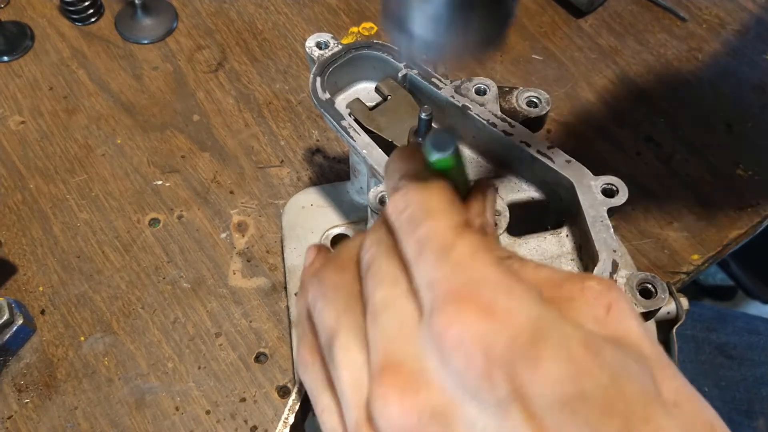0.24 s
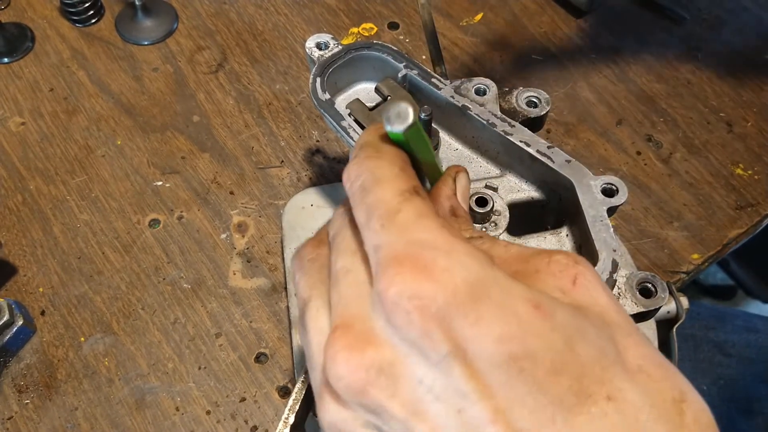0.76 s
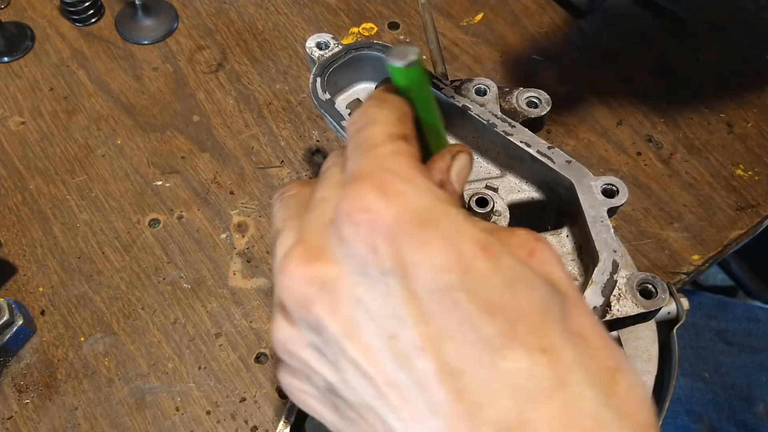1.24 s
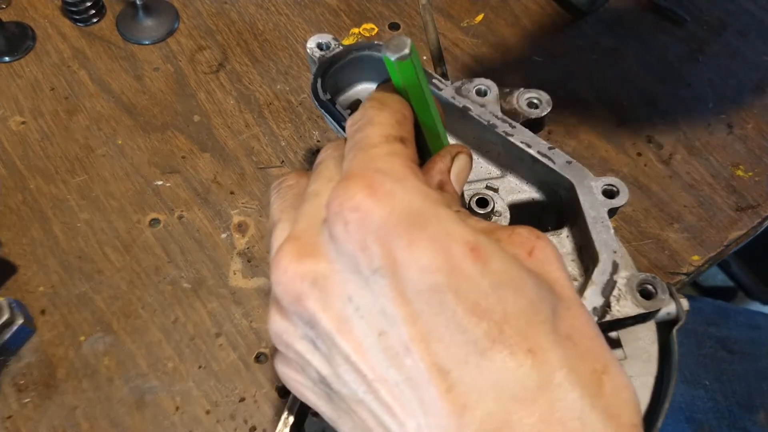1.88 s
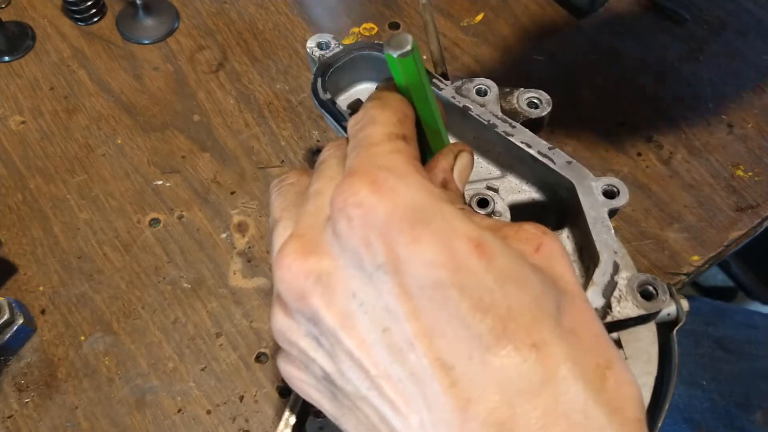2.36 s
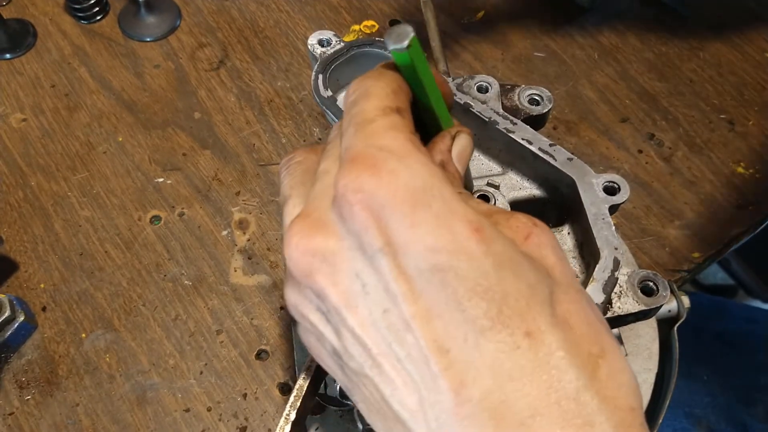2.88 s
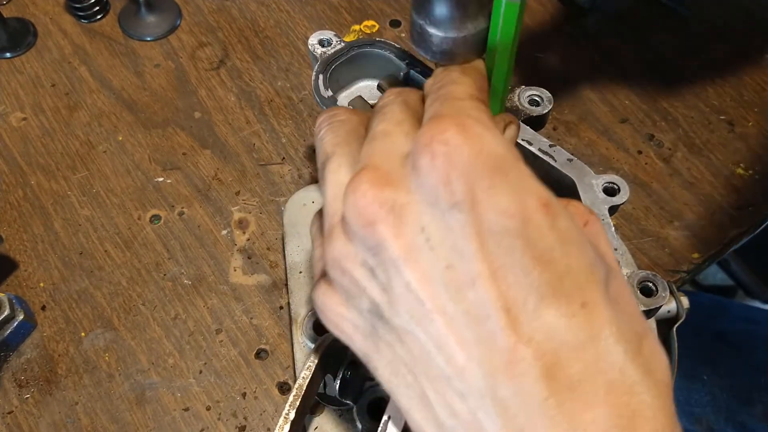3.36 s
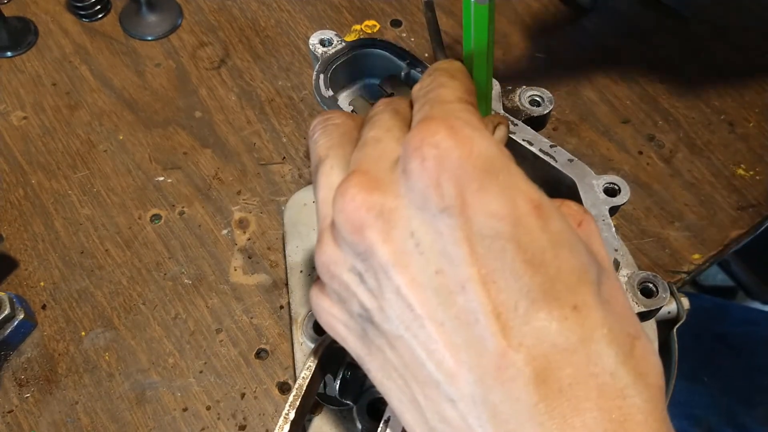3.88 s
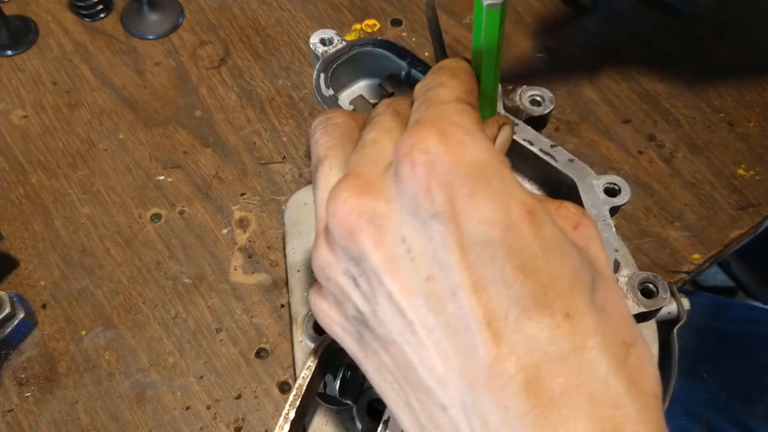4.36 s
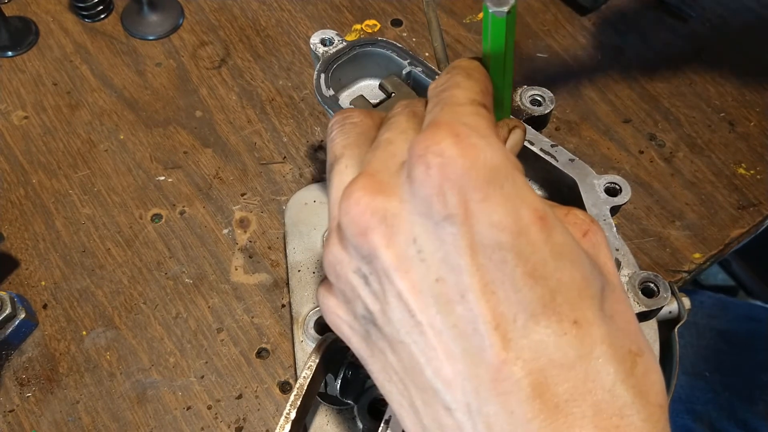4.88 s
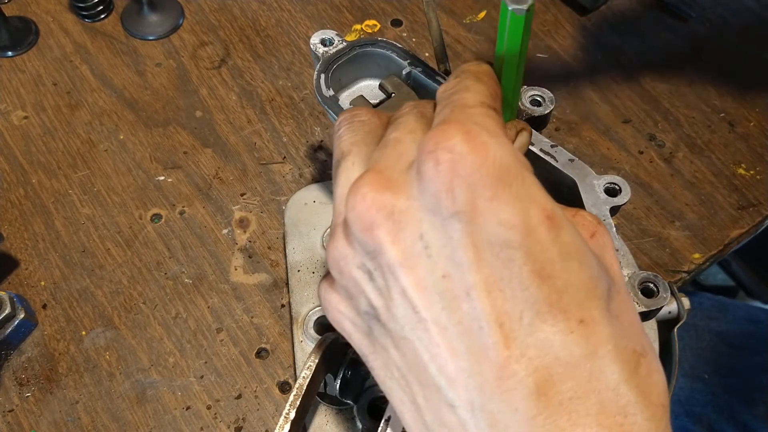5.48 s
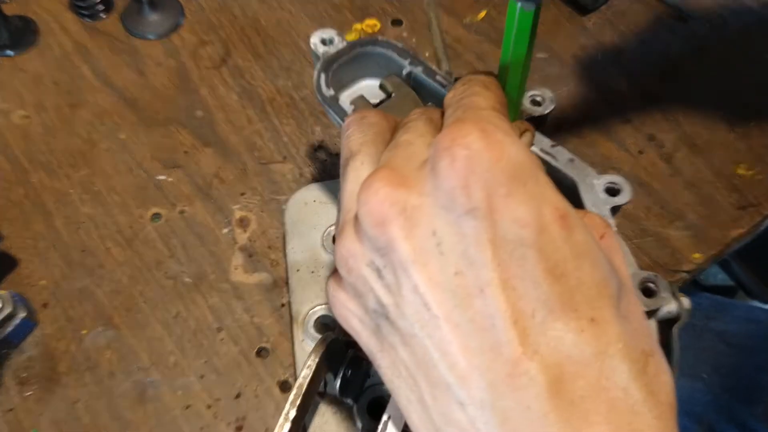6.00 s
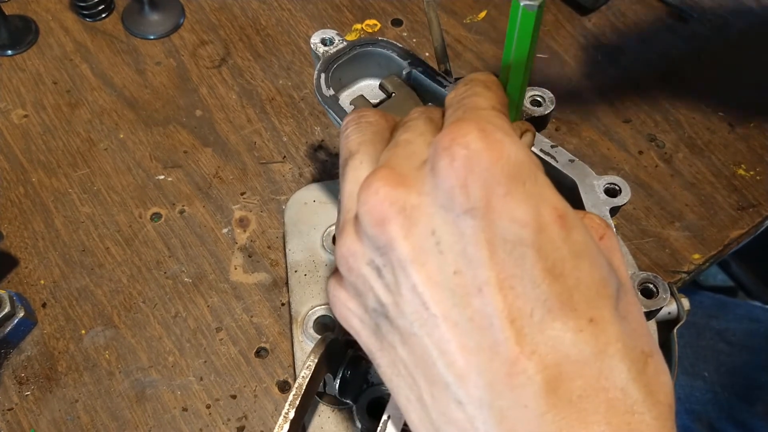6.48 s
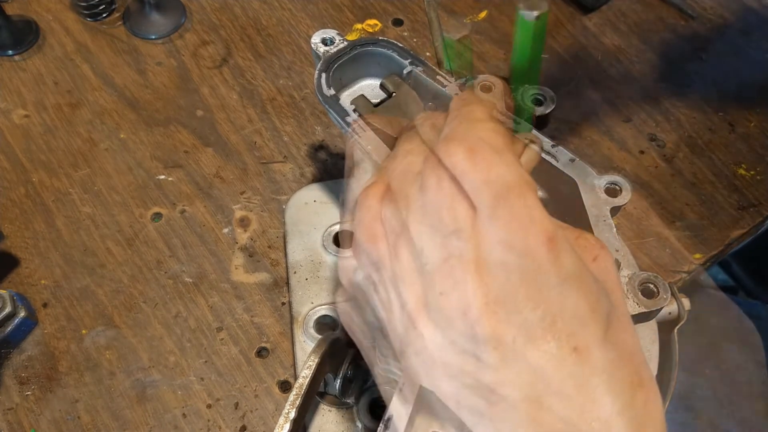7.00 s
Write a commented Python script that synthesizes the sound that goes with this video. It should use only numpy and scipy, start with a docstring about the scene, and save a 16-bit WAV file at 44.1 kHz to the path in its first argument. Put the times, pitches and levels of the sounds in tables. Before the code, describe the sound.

A hammer hits a steel punch set against a metal engine casting on a wooden bench, heard close up in a quiet garage. The sound opens on a fading ring, and a hard blow lands at about 0.2 seconds: a sharp crack, a bright clang and a thud, leaving thin steel pings over a low ringing tone. Faint ticks follow as the punch is moved. A soft tap at 1.6 seconds leads into three increasingly hard blows from 1.9 to 2.5, then a few light clicks. Another tap at 3.4 leads into three more from 3.7 to 4.3, the last very hard, with a clink at 4.5. Three gentle taps between 5.1 and 5.7 seconds build into three stronger blows from 6 to 6.6. After the stronger blows in each run, the casting rocks back with a small hollow clunk. The ringing fades around 7 seconds.

```python
"""Sharp hammer blows on a steel punch, set against an engine casting on a wooden garage bench.
Each blow cracks, thuds through the bench, sets the casting clanging and leaves thin steel pings
over a low ring. The casting rocks back after hard blows, and the punch ticks as it is moved.
A close camera's limiter ducks the hard blows and lets their tails swell back."""
import sys
import numpy as np
from scipy import signal
from scipy.fft import rfft, irfft, next_fast_len
from scipy.io import wavfile
from scipy.ndimage import uniform_filter1d, minimum_filter1d, map_coordinates

SR = 44100
rng = np.random.default_rng(int(sys.argv[2]) if len(sys.argv) > 2 else 0)


def transcribe(u):
    """Save the signal u as a 16-bit wav file named by the first command-line argument.

    u: samples, shape (n,) or (channels, n), limited to [-1, 1]; the rate is SR.
    q: integer samples, one column per channel.
    """
    v = np.clip(np.atleast_2d(u).T, -1, 1)
    q = np.round(v * 32767).astype(np.int16)
    wavfile.write(sys.argv[1], SR, q)


N = 319284
PREROLL = SR // 2  # samples ahead of time zero, so the scene can open on a ringing blow


def amp(db):
    """Decibels to gain."""
    return 10 ** (np.asarray(db) / 20)


def curve(points, hz):
    """Read (Hz, value) points along a log frequency axis."""
    f, v = np.transpose(points)
    return np.interp(np.log(hz + 1), np.log(f + 1), v)


def pan(db):
    """Left and right gains; positive dB leans left."""
    return amp(np.multiply.outer([.5, -.5], db))


def add(mix, s, sound):
    """Lay a sound into the mix at a time in seconds."""
    part = mix[:, PREROLL + round(s * SR):][:, :sound.shape[1]]
    part += sound[:, :part.shape[1]]


def ring(hz, gains, t60, phases, length, attack_s, flutter, rate=100):
    """Damped stereo sines; flutter smears each into a cluster of neighbours."""
    t, place = np.arange(length) / SR, np.arange(length // 100 + 2)
    real, imag = rng.standard_normal((2, len(hz), len(place)))
    rates = np.broadcast_to(rate, hz.shape)
    sway = np.array([np.interp(t * r, place, knots) for r, knots in zip(rates, real + 1j * imag)])
    wave = (1 + flutter * sway) * np.exp((2j * np.pi * hz - np.log(1000) / t60)[:, None] * t)
    return ((gains * np.exp(1j * phases)) @ wave).imag * (1 - np.exp(-t / attack_s))


# Decay of the noise tails. Each row: frequency in Hz, t60 in seconds before stretching.
TAIL_T60 = [(40, 0.97), (150, 0.31), (500, 0.32), (2000, 0.37), (8000, 0.36), (16000, 0.28)]
# Stereo width. Each row: frequency in Hz, left-right likeness (1 is mono).
LIKENESS = [(40, 0.86), (150, 1), (500, 0.21), (2000, 0.012), (8000, 0.014)]
# Stereo lean. Each row: frequency in Hz, pan in dB.
BAND_PAN = [(40, -5), (300, 4.5), (1000, 6), (3000, 6), (9000, -3), (15000, -1)]
def noise(spectrum, length, stretch=np.inf):
    """Coloured stereo noise, each band dying at its own speed; steady if no stretch is given."""
    hz, t, white = signal.stft(rng.standard_normal((2, length)), SR, nperseg=256)
    width = np.arccos(np.clip(curve(LIKENESS, hz), -1, 1))[:, None] / 2
    mid, side = white[0] * np.cos(width), white[1] * np.sin(width)
    colour = amp(curve(spectrum, hz))
    colour = colour / np.sqrt(np.mean(colour ** 2)) * pan(curve(BAND_PAN, hz))
    fade = amp(-60 * t / (stretch * curve(TAIL_T60, hz)[:, None]))
    bands = np.array([mid + side, mid - side]) * colour[..., None] * fade
    return signal.istft(bands, SR, nperseg=256)[1][:, :length]


# Colour of the garage air. Each row: frequency in Hz, relative density in dB.
AIR_EQ = [(15, -45), (25, -24), (118, -9), (321, -24), (422, 12), (553, -28.5), (1060, -24), (9330, -33.5),
          (15200, -44.5), (16500, -59)]
def room_tone():
    """A faint, steady bed of air."""
    return amp(-75) * noise(AIR_EQ, PREROLL + N)


# Colour of metal hitting metal. Each row: frequency in Hz, relative density in dB.
CLATTER_EQ = [(180, -27), (300, -10.5), (367, -8.5), (617, -7.5), (954, -3), (2360, -13), (2890, -7.5),
              (3710, -16), (4240, -11.5), (6140, -9.5), (6670, -8.5), (9300, -8), (11800, -11.5),
              (15200, -17), (16500, -44)]
def clatter(length, stretch=np.inf, tilt_db=0):
    """Bright metallic noise, tilted in dB per octave."""
    return noise([(hz, db + tilt_db * np.log2(hz / 2000)) for hz, db in CLATTER_EQ], length, stretch)


# The casting's landings. Each row: start in seconds, pitch in Hz.
LANDINGS = [(1.936, 409), (2.219, 434), (2.526, 357), (3.784, 423), (4.07, 395), (4.362, 377), (6.078, 396),
            (6.375, 383), (6.670, 416)]
def clunks():
    """The casting rocks back onto the bench: a hollow bump with a little clatter."""
    mix, n = np.zeros((2, PREROLL + N)), SR // 8
    ratios, t60 = np.array([.8, 1, 1.3, 2.1]), np.full(4, .07)
    gains = amp([[-12.5, 12, -1.5, -2], [-9, -14, -11.5, -9.5]])  # left, right
    for s, hz in LANDINGS:
        bump = ring(hz * ratios, gains, t60, np.zeros(4), n, attack_s=0.0037, flutter=1)
        add(mix, s, amp(-19) * (bump + amp(-4.5) * clatter(n, stretch=0.31)))
    return mix


# The casting's modes. Each entry: pitch in Hz.
CLANG_HZ = [117, 190, 345, 838, 929, 1815, 1845, 2514, 2890, 3222, 3467, 3920, 4175, 4403, 4477, 4883, 5250,
            5303, 5730, 6170, 6493, 6602, 7020, 7320, 8050, 8440, 9210, 9570, 11200, 13300]
# The same modes. Each row: relative level in dB, t60 in seconds before stretching.
CLANG_MODES = [(-13.5, 0.33), (-12.5, 0.13), (-8.5, 0.16), (-2, 0.2), (-1.5, 0.18), (-10.5, 0.3),
               (-15.5, 0.35), (-19.5, 0.2), (-2, 0.33), (-12, 0.32), (-15.5, .3), (-8, 0.11), (-9.5, 0.36),
               (0, 0.07), (-6.5, 0.28), (-3, 0.21), (-5, 0.2), (-8, 0.18), (-14, 0.33), (-8, 0.37),
               (-1.5, 0.14), (-8.5, 0.095), (-9.5, 0.12), (-26.5, 0.67), (-5.5, 0.22), (-2, .2),
               (-9.5, 0.32), (-9.5, 0.31), (-21.5, 0.4), (-17, 0.14)]
def clang(length, stretch, path, tilt_db):
    """Each hit stirs the casting's modes anew; path sets each mode's pan and left-right phase."""
    hz, (db, t60) = np.array(CLANG_HZ), np.transpose(CLANG_MODES)
    scatter, phase = rng.standard_normal((2, len(hz)))
    gains = amp(db + 3 * scatter + tilt_db * np.log2(hz / 2000)) * pan(curve(BAND_PAN, hz) + 5 * path[0])
    phases = np.pi * phase + np.outer([1, -1], 1.397 * path[1] * np.minimum(hz / 600, 1))
    return ring(hz, gains, stretch * t60, phases, length, 0.00047, flutter=2.5, rate=20 + .016 * hz)


# Modes of the punch's tip. Each row: pitch in Hz, relative level in dB, t60 in seconds.
TIP_MODES = [(5330, 1, 0.041), (8500, -13, 0.029), (13150, -25.5, 0.083), (3720, -14.5, 0.061)]
# Colour of a tick's low knock. Each row: frequency in Hz, relative density in dB.
KNOCK_EQ = [(59, -55.5), (100, -12.5), (417, -9.5), (641, -11), (1880, -17), (2310, -18), (2500, -15.5),
            (3250, -36.5), (5500, -120)]
# Light contacts. Each row: start in seconds, level in dB, knock and clink trims in dB, pan in dB.
CONTACTS = [(0.6633, -39, 0, -4, -1), (0.7383, -53.5, 1, -10.5, -7), (0.9029, -54.5, 5.5, -26, -3),
            (0.923, -59, 9.5, -22, -6), (1.064, -53, -11.5, -31, -8.5), (1.3987, -67.5, -53, -5.5, -17),
            (1.5581, -68, 16, 5.5, -6.5), (2.6232, -17.5, -28.5, -21, -7.5), (2.8744, -54.5, -13, -17, -1),
            (2.9657, -36, -12, -9, 0.5), (3.0395, -34, -20.5, -15, -5.5), (3.326, -63, -30.5, -12.5, -7.5),
            (4.5177, -20, -21.5, 5, -2.5), (4.6698, -32, -8, -38, 7), (7.0586, -60, -1, -24, -6),
            (7.0891, -55.5, -11, -18.5, -3)]
def ticks(path):
    """The punch and loose parts touch the casting: a click, a little clang, a clink and a knock."""
    mix, n = np.zeros((2, PREROLL + N)), SR // 5
    t = np.arange(n) / SR
    hz, tip_db, t60 = np.transpose(TIP_MODES)
    for s, db, knock_db, clink_db, pan_db in CONTACTS:
        click = (amp(-20) + amp(-6 - 60 * t / 0.0061)) * clatter(n, stretch=0.47)
        body = amp(-25) * clang(n, 0.8, path, tilt_db=-2.5)
        phases = np.pi * rng.standard_normal((2, len(hz)))
        clink = ring(hz, amp([tip_db, tip_db]), t60, phases, n, attack_s=0.00037, flutter=1.4, rate=250)
        knock = amp(knock_db) * noise(KNOCK_EQ, n, stretch=0.53)
        add(mix, s, amp(db) * pan(pan_db)[:, None] * (click + body + amp(clink_db) * clink + knock))
    return mix


# Where the low ring falls away until the next blow. Each entry: start in seconds.
LOW_RING_FADES = [1.03, 4.915, 6.87]
def low_ring(hz=425.5, swell_s=0.31, sag_db_per_s=9.5, fade_db=17, fade_s=0.66):
    """One slightly unsteady tone, far to the left; every hammer blow sets it ringing anew."""
    starts, db = np.transpose(HAMMER_BLOWS)[[0, -1]]
    t = (np.arange(PREROLL + N) - PREROLL) / SR
    last = np.maximum(np.searchsorted(starts, t) - 1, 0)
    fade = sum((starts[last] < at) * np.clip((t - at) / fade_s, 0, 1) for at in LOW_RING_FADES)
    target_db = db[last] - sag_db_per_s * (t - starts[last]) - fade_db * fade
    pole = np.exp(-1 / (swell_s * SR))
    lagging_db = signal.lfilter([1 - pole], [1, -pole], target_db - db[0]) + db[0]
    level_db = np.minimum(target_db, lagging_db + sag_db_per_s * swell_s)  # slow up, fast down
    drift = map_coordinates(rng.standard_normal(80), [np.linspace(0, 79, len(t))])
    phase = 2 * np.pi * hz * t + .3 * drift - np.array([[1.6], [0]])
    return amp(uniform_filter1d(level_db, SR // 50)) * pan(16.6)[:, None] * np.sin(phase)


# The long steel rings. Each entry: pitch in Hz.
PING_HZ = [971, 1060, 1239, 1388, 1875, 2817, 2900, 2937, 4239, 6424, 6526]
# The same rings. Each row: relative level in dB, t60 in seconds, pan in dB,
# left phase lead in radians, family (0 first, 1 second).
PING_MODES = [(-17.5, 0.52, -10, 0.5, 1), (-38, 0.92, -8, -1.5, 0), (-36, 1, 2, 2.1, 0),
              (-25.5, 0.61, 1, 1.5, 1), (-18, 0.47, -0.5, 2.03, 1), (-8, 0.55, -12.5, 3.5, 0),
              (-10, 0.25, -5, 2, 1), (-7, 0.46, -11.5, -2, 0), (-15.5, 0.3, 5, 2.4, 1),
              (-15.5, 0.42, -15, 4, 0), (-1, 0.39, -7.5, -2, 1)]
def steel_pings(first_db, second_db):
    """Struck steel rings on in two families of thin tones, each at its own level."""
    hz, (db, t60, pan_db, lead, family) = np.array(PING_HZ), np.transpose(PING_MODES)
    scatter, phase = rng.standard_normal((2, len(hz)))
    gains = amp(db + np.where(family > .5, second_db, first_db) + 3 * scatter) * pan(pan_db)
    phases = np.pi * phase + np.outer([.5, -.5], lead)
    return ring(hz, gains, t60, phases, 4 * SR // 5, attack_s=0.0084, flutter=0.24, rate=23)


# Colour of the wooden bench. Each row: frequency in Hz, relative density in dB.
BENCH_EQ = [(15, -46), (30, -16), (55, 0), (86, -6), (114, 4), (275, -8), (330, -0.5), (700, -13),
            (910, -41.5), (1540, -120)]
def bench_thud(t, stretch):
    """The bench takes the blow with a soft-edged, bassy thump."""
    return (1 - np.exp(-t / 0.012)) * noise(BENCH_EQ, len(t), stretch)


# Tail lengths. Each entry: one blow's factor on the decay of its clatter, clang and thud.
BLOW_STRETCH = [0.86, 0.92, 0.88, 0.87, 0.95, 0.97, 0.89, 0.95, 0.93, 0.88, 0.7, 0.83, 0.87, 0.93, 0.96,
                0.93]
# The blows. Each row: start in seconds, strength in dB, trims in dB for the thud, first pings and
# second pings, pan in dB, level of the low ring in dB.
HAMMER_BLOWS = [(-.1, 4.5, -10, -23.5, -16, -4, -49), (0.1881, 5.5, -10.5, -22, -12, -4, -43),
                (1.5947, -23.5, -10, -15, 0, -3, -65.5), (1.8722, -4, -9, -14, -7.5, 0, -55),
                (2.1728, 0.5, -10, -10.5, -7, -4, -54.5), (2.4598, 2.5, -11, -11, -6, -2, -56.5),
                (3.4084, -24, -20.5, -4.5, -5, -5, -67), (3.7370, -5, -10.5, -1, -7, -2.5, -56),
                (4.0252, 0.5, -11.5, -2.5, -11, -1, -45.5), (4.3137, 6.5, -13, -4, -16, -1.5, -46),
                (5.1205, -29, -39.5, -7, -21.5, -6, -62.5), (5.404, -20.5, -5, -17, 1, -4.5, -65),
                (5.698, -24, -20, -15, -3.5, -6, -75), (6.0327, -10.5, -4.5, -12.5, 1, -8.5, -53),
                (6.3268, -2.5, -12, -11, -2, -3, -49), (6.6209, 0, -11.5, -7, -7, 1, -51.5)]
def hammer(path, lead_in_ahead_s=0.0038, lead_in_peak_s=0.02):
    """The hammer meets the punch: crack, clatter, clang, thud and pings."""
    mix, n = np.zeros((2, PREROLL + N)), SR // 2
    t = np.arange(n) / SR
    crack = 1 + amp(10 - 60 * t / 0.019)
    lead_in_shape = np.exp(-np.abs(t[:SR // 25] - lead_in_peak_s) / 0.0013)
    for (s, db, thud_db, first_db, second_db, pan_db, _), stretch in zip(HAMMER_BLOWS, BLOW_STRETCH):
        tilt_db = -1.42 - 0.1286 * thud_db  # the less a blow reaches the bench, the brighter it is
        metal = crack * amp(-5.5) * clatter(n, stretch, tilt_db)
        metal += amp(-14) * clang(n, stretch, path, tilt_db)
        thud = amp(thud_db) * bench_thud(t, stretch)
        add(mix, s, amp(db) * (pan(pan_db)[:, None] * metal + thud))
        add(mix, s, steel_pings(db + first_db, db + second_db))
        # a faint, brief puff of hiss just ahead of each crack
        lead_in_hiss = lead_in_shape * clatter(len(lead_in_shape), tilt_db=tilt_db)
        add(mix, s - lead_in_ahead_s - lead_in_peak_s, amp(1.8 * db - 8) * lead_in_hiss)
    return mix


def limiter(x, threshold_db=-17, slope=0.8, hold_s=0.094, held_share=0.16, follow_s=0.02):
    """Peaks pull the gain down; part is held for a moment, part follows the level back up."""
    def deepest(db, seconds):
        half = int(seconds * SR / 2)
        return minimum_filter1d(db, 2 * half + 1, origin=half)
    power = np.abs(uniform_filter1d(np.max(x ** 2, 0), int(0.021 * SR) + 1))
    duck_db = -slope * np.maximum(10 * np.log10(power + 1e-12) - threshold_db, 0)
    gain_db = held_share * deepest(duck_db, hold_s) + (1 - held_share) * deepest(duck_db, follow_s)
    return x * amp(uniform_filter1d(gain_db, int(0.001 * SR) + 1))


# Level jumps about a tenth of a second after a blow. Each row: time in seconds, jump in dB.
LEVEL_JUMPS = [(.299, 3.5), (1.984, 4), (2.282, 2.5), (2.568, 4), (3.519, -2.5), (3.847, 5), (4.132, 3.5),
               (6.143, 4.5), (6.426, 5), (6.735, 2)]
def level_ride(sag_s=0.097, jump_s=.003):
    """The level sags, then snaps back up; a negative jump swells and snaps down."""
    t = np.arange(N) / SR
    return amp(-sum(db * np.interp(t, [s - sag_s, s, s + jump_s], [0, 1, 0]) for s, db in LEVEL_JUMPS))


def scene():
    """All layers through the limiter, then the level ride."""
    path = rng.standard_normal((2, len(CLANG_MODES)))  # one stereo image for every clang
    mix = room_tone() + hammer(path) + ticks(path) + clunks() + low_ring()
    return level_ride() * limiter(mix)[:, PREROLL:]


def record(dry):
    """The camera rounds off the highest peaks and keeps nothing above its band limit."""
    ceiling, top_hz = .8, 16300
    size = next_fast_len(N + SR // 2)
    hz = np.fft.rfftfreq(size, 1 / SR)
    rounded = ceiling * np.tanh(dry / ceiling)
    return irfft(rfft(rounded, size) * (hz < top_hz), size)[:, :N]


dry = scene()
out = record(dry)
transcribe(out)
```